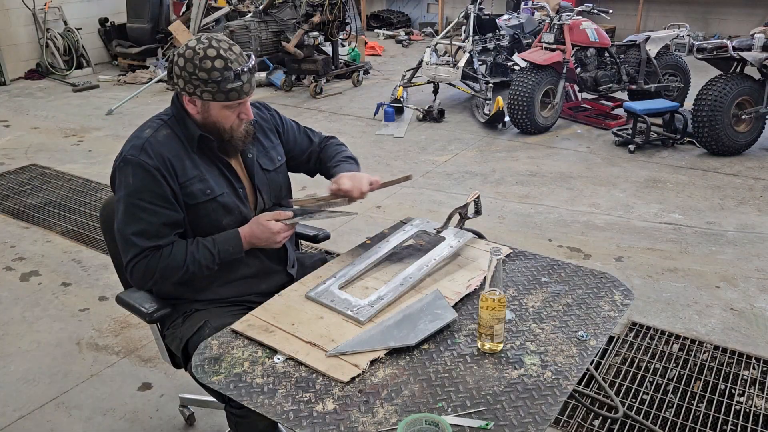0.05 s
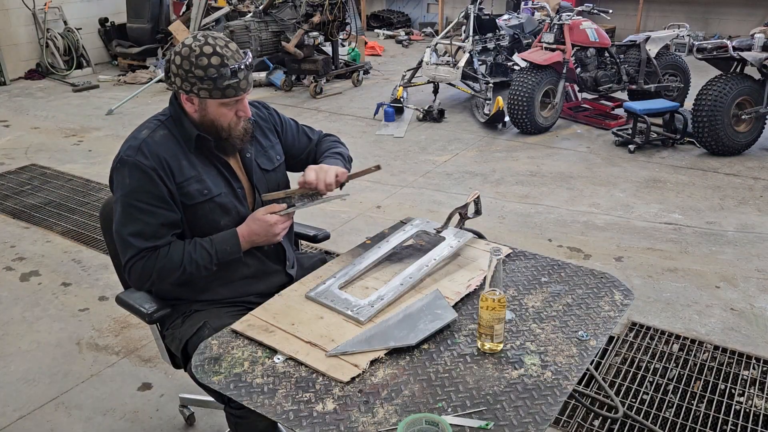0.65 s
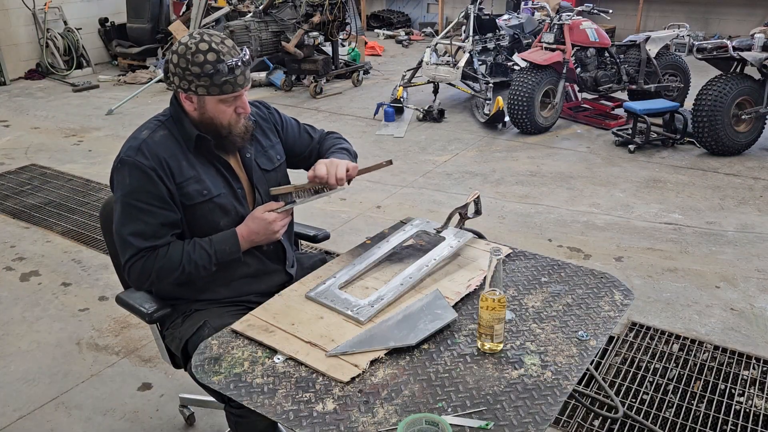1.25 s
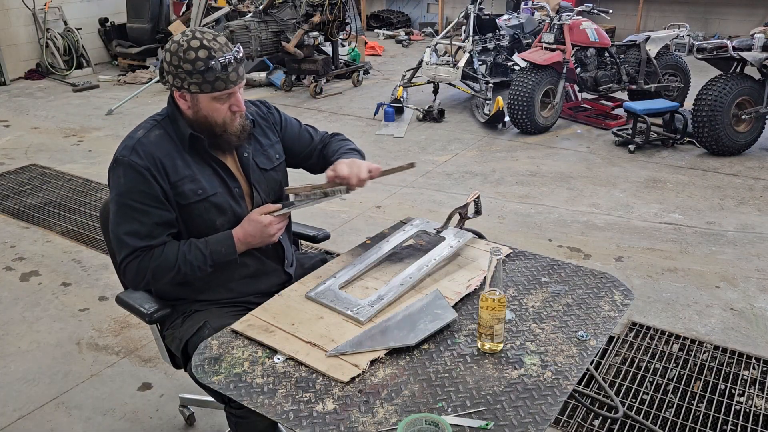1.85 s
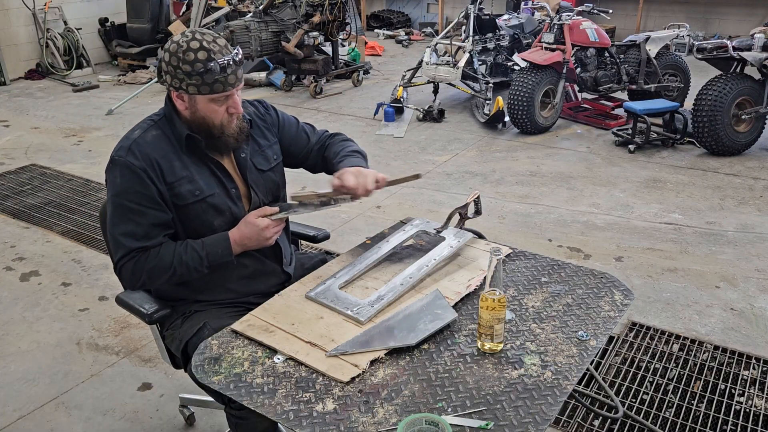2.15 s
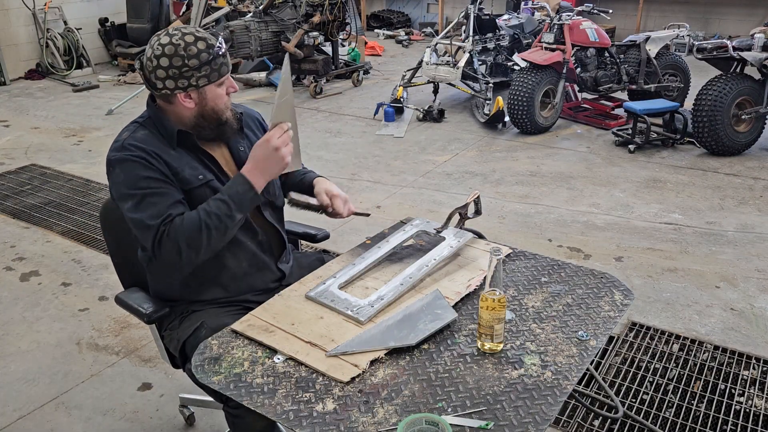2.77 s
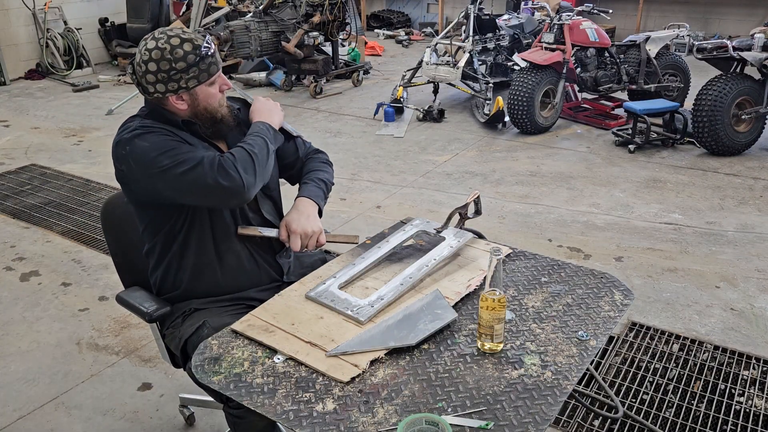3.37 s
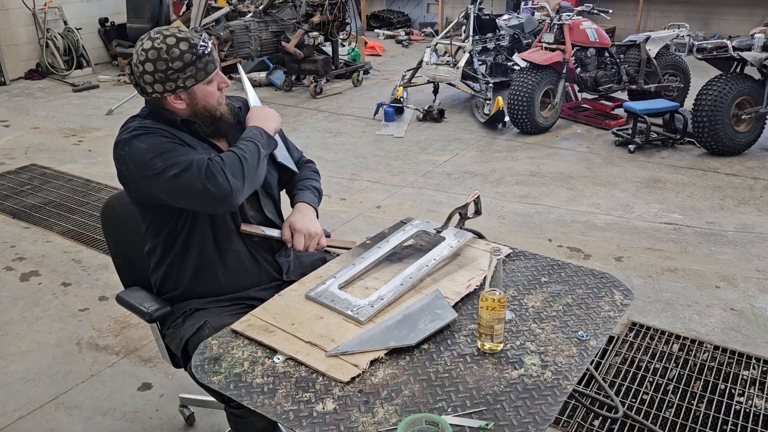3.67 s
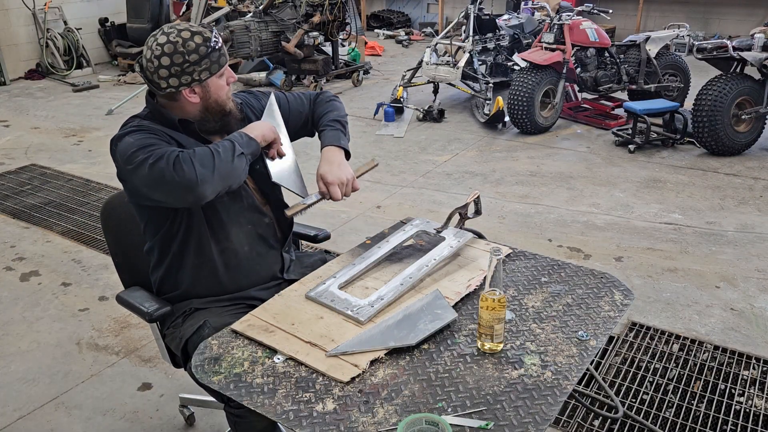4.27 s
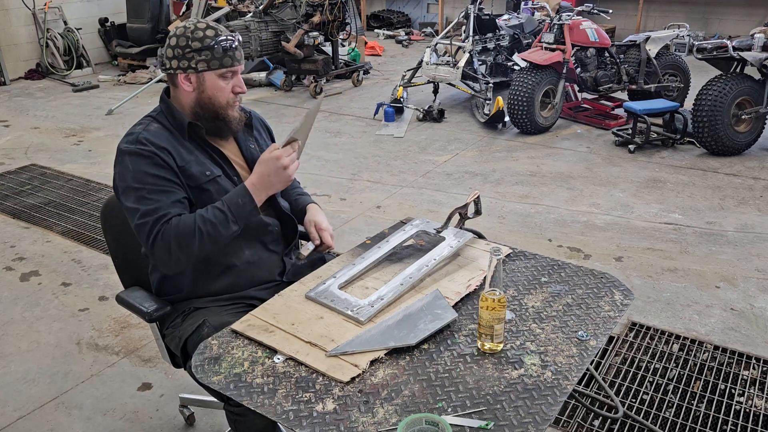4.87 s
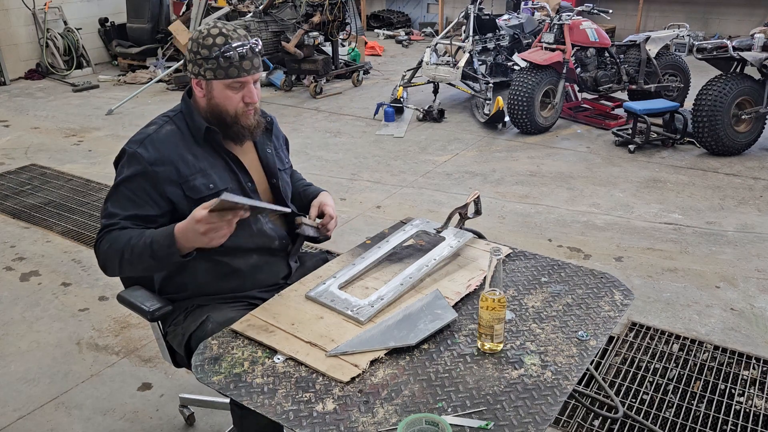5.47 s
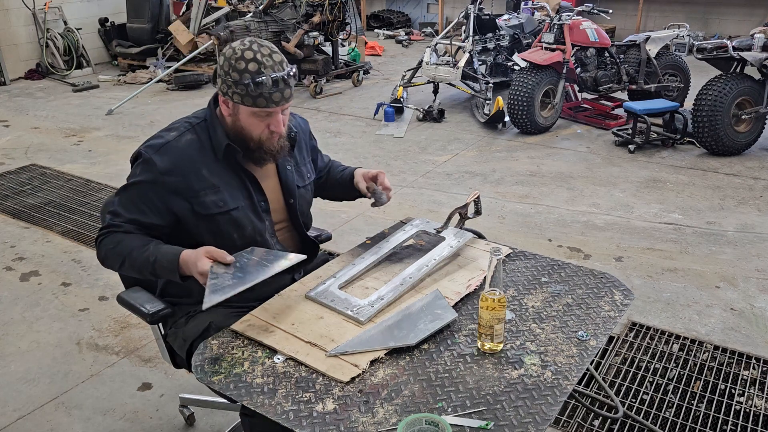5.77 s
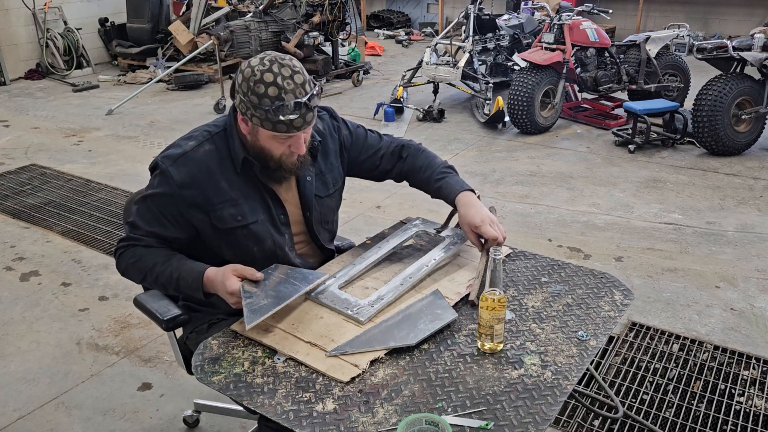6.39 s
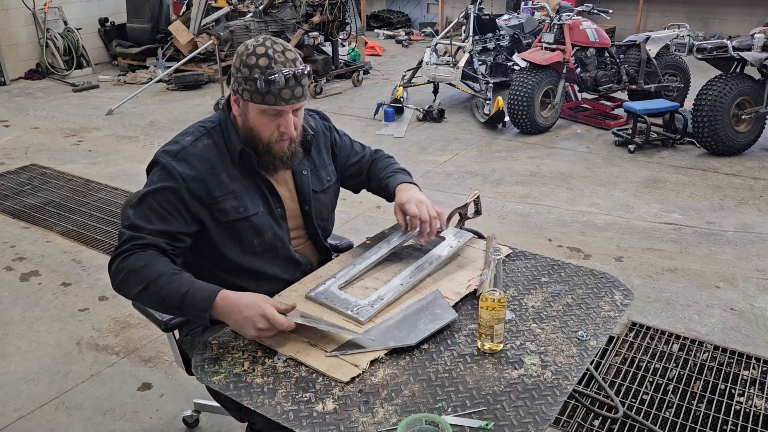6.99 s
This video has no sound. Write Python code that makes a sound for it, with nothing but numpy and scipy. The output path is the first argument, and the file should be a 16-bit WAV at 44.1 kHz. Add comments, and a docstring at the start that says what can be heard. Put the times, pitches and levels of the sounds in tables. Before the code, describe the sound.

A wire brush scrubs a ringing aluminium plate, followed by soft bumps, cloth scrapes and a knock on a steel bench in an echoing workshop.

```python
"""Wire-brushing an aluminium plate

A wire brush scrubs a hand-held plate about nine strokes a second and flicks off its edge: the wires
hiss and make the metal ring. The plate bumps and wipes across a jacket sleeve, a chair clacks, and the
brush is put down on a steel bench, which booms. A large workshop echoes over a faint hum and hiss."""
import sys
import numpy as np
from scipy import signal
from scipy.fft import rfft, irfft, next_fast_len
from scipy.io import wavfile
from scipy.ndimage import uniform_filter1d

SR = 44100
rng = np.random.default_rng(int(sys.argv[2]) if len(sys.argv) > 2 else 0)


def unload_audio(sound):
    """Save the sound as a 16-bit wav file, at the path given as the first command line argument."""
    columns = np.transpose(np.atleast_2d(sound))
    # keep every value between -1 and 1, then stretch to whole-number steps
    steps = np.round(np.clip(columns, -1, 1) * 32767)
    wavfile.write(sys.argv[1], SR, steps.astype(np.int16))


N = 314600
T = np.arange(N) / SR

# the tones the aluminium plate rings at: pitch_hz, level_db, ring_s (time to fade by 60 dB)
PLATE_TONES = [(205.3, -3, 0.2), (242, -6, 0.59), (298, -10.5, 0.24), (363.4, -10.5, 0.17),
               (471.6, -5, 0.15), (508, -7, 0.077), (565, -15.5, 0.68), (661.5, -2, 0.12),
               (944, -1.5, 0.065), (973, -3, 0.084), (1218, -13.5, 0.19), (1427, -10, 0.13),
               (1492, -0.5, 0.023), (1726, -7.5, 0.079), (2154, 0.5, 0.022), (2510, -1, 0.089),
               (2747, 1.5, 0.022), (3150, -3.5, 0.092), (3420, -2, 0.083), (4010, 1.5, 0.023),
               (4300, 0, 0.019), (4850, -3, 0.04), (5445, -0.5, 0.026), (5680, 3.5, 0.044),
               (7138, 3.5, 0.05), (7880, 6, 0.05), (8074, 9.5, 0.048), (8600, -4, 0.016), (12270, 3, 0.037)]
# the tones of the steel bench and the metal parts on it: pitch_hz, level_db, ring_s
BENCH_TONES = [(122, -13.5, 0.4), (450.5, -6, 0.35), (488.6, -0.5, 0.15), (527, -3.5, 0.13),
               (582, -6.5, 0.21), (647, -18, 0.19), (692, -13.5, 0.67), (1245, -20, 0.3), (1392, -16, 0.17),
               (1660, -39, 0.099), (1820, -19.5, 0.033), (2320, -37, .03), (3380, -33, .11)]
# the tone colour of a hard hit: pitch_hz, level_db
CRACK_COLOUR = [(40, -1), (130, -0.5), (600, 0.5), (1400, -2.5), (2800, -6.5), (4000, -19), (6000, -25.5),
                (10000, -34.5), (15000, -31)]


def undb(db):
    """Turn decibels into a number to multiply by."""
    return 10 ** (np.asarray(db) / 20)


def unit(x):
    """Scale a sound to an average (rms) level of 1."""
    return x / np.sqrt(np.mean(x ** 2))


def colour(x, curve):
    """Turn lows and highs up or down along a curve of pitch_hz, level_db."""
    size = next_fast_len(len(x), real=True)
    hz, db = np.transpose(curve)
    gains = undb(np.interp(np.log(np.fft.rfftfreq(size, 1 / SR) + 1), np.log(hz), db))
    return irfft(rfft(x, size) * gains, size)[:len(x)]


def cut_bass(x, hz):
    """Weaken everything below a pitch."""
    return signal.sosfilt(signal.butter(2, hz, "high", fs=SR, output="sos"), x)


def convolve(x, response):
    """Let x set an object or a room ringing."""
    return signal.oaconvolve(x, response)[:N]


def ring(tones):
    """An object's answer to one tap: fading tones with a total energy of 1."""
    t = T[:SR * 3 // 4]
    y = sum((-1) ** k * undb(db) / np.sqrt(ring_s)
            * np.sin(2 * np.pi * hz * t) * np.exp(-np.log(1000) * t / ring_s)
            for k, (hz, db, ring_s) in enumerate(tones))
    return y / np.sqrt(np.sum(y ** 2))


def burst(curve, fade_s):
    """The short noise of a hit, with an energy of 1."""
    t = T[:SR // 8]
    y = colour(rng.standard_normal(len(t)), curve) * np.exp(-t / fade_s)
    return y / np.sqrt(np.sum(y ** 2))


def grains(per_s, spread_db):
    """The crackle of rubbing: many tiny slips of uneven size."""
    sizes = undb(spread_db * np.minimum(rng.exponential(size=N), 5))
    return unit(rng.standard_normal(N) * sizes * (rng.random(N) < per_s / SR))


def wander(per_s):
    """A smooth random drift of about 1 either way."""
    size = int(SR / per_s)
    held = np.repeat(rng.standard_normal(N // size + 2), size)
    return 1.3 * uniform_filter1d(uniform_filter1d(held, size), size)[:N]


def swell(at, rise_s, fade_s):
    """A loudness curve that grows to 1 at a moment and dies away."""
    return np.exp(np.maximum(np.minimum((T - at) / rise_s, (at - T) / fade_s), -40))


def rubs(rows, rise_share):
    """The loudness of rubs that grow for a share of their length and fade for the rest."""
    return sum(undb(db) * swell(at, rise_share * length, (1 - rise_share) * length)
               for at, db, length in rows)


def contacts(rows, rise_s, fade_s):
    """The loudness of touches that differ only in strength."""
    return sum(undb(db) * swell(at, rise_s, fade_s) for at, db in rows)


def add(track, at, sound):
    """Mix a short sound in at a time."""
    start = int(at * SR)
    track[start:start + len(sound)] += sound[:N - start]


def place(x, lead, samples=2):
    """Sound from the left reaches the left microphone a little earlier."""
    side = lead * (np.roll(x, -samples) - np.roll(x, samples))
    return np.array([x + side, x - side])


def background(air_db=-57.5, rumble_db=-50.5, rumble_end_s=0.498):
    """Steady air hiss and mains hum, with a low rumble at first that stops short."""
    # the tone colours of the hiss and the rumble: pitch_hz, level_db
    air_colour = [(20, -11), (60, -7.5), (90, -12), (120, -8.5), (160, -13), (600, -17.5), (800, -21.5),
                  (4500, -25), (6300, -25), (7800, -18.5), (9700, -25), (12000, -15), (15800, -20)]
    rumble_colour = [(20, -0.5), (60, 0), (110, -10.5), (250, -8.5), (500, -11.5), (1000, -21), (3000, -51)]
    # the mains hum: pitch_hz, level_db
    hum_tones = [(59.6, -70), (119, -76), (597.5, -79.5)]
    air = np.array([unit(colour(rng.standard_normal(N), air_colour)) for _ in range(2)])
    hum = sum(undb(db) * np.sqrt(2) * np.sin(2 * np.pi * (hz * T + rng.random()))
              for hz, db in hum_tones)
    rumble = unit(colour(rng.standard_normal(N), rumble_colour))
    rumble *= np.clip((rumble_end_s - T) / 0.0058, 0, 1)
    return undb(air_db) * air + hum + undb(rumble_db) * rumble


def workshop_echo(x, build_s=0.01):
    """The walls give each side its own echo, which builds quickly and lasts longest at middle pitches."""
    # the echo, band by band: pitch_hz, ring_s, level_db
    bands = [(99, 0.33, -8.5), (370, 1.08, 1.5), (1200, 1.42, 0), (3480, 1.14, 0.5), (7250, 0.67, -3),
             (13800, 0.32, -7)]
    t = T[:SR * 3 // 2]
    log_hz = np.log(np.fft.rfftfreq(len(t), 1 / SR) + 1)
    centres = np.log([row[0] for row in bands])
    out = []
    for _ in range(2):
        noise, tail = rfft(rng.standard_normal(len(t))), 0
        for band, (_, ring_s, db) in zip(np.eye(len(bands)), bands):
            band_noise = irfft(noise * np.interp(log_hz, centres, band), len(t))
            fade = np.exp(-np.log(1000) * t / ring_s) * (1 - np.exp(-(t / build_s) ** 2))
            tail += undb(db) * band_noise * fade / np.sqrt(np.sum(fade ** 2))
        out.append(convolve(x, tail))
    return np.array(out)


def chair_clack():
    """A chair tips forward: a quick double clack with a short hollow ring."""
    # the two hits: start_s, level_db
    clacks = [(5.366, -20), (5.37, -20)]
    # the chair's ring: pitch_hz, level_db, ring_s
    chair_tones = [(397, -13, 0.036), (664, -3, 0.081), (747, -5.5, 0.078), (984, -2, 0.07),
                   (1078, 4, 0.056), (1320, -1.5, 0.013), (1460, -5, 0.047), (1630, 0, 0.035),
                   (2740, -15, 0.041)]
    out = np.zeros(N)
    for at, db in clacks:
        add(out, at, undb(db) * ring(chair_tones))
        add(out, at, undb(db - 3.5) * burst(CRACK_COLOUR, fade_s=0.0015))
    return out


def sleeves():
    """Cloth crackles softly as it slides and shoves the cardboard on the bench."""
    # sleeves sliding: peak_s, level_db, length_s
    slides = [(3.04, -61.5, 0.17), (3.57, -61, 0.1), (3.965, -55, 0.039), (4.045, -51, .06),
              (4.122, -57, 0.021), (4.27, -56.5, 0.093), (4.53, -59.5, 0.11), (6.16, -54.5, 0.21)]
    # shoves of the cardboard: peak_s, level_db
    shoves = [(6.032, -44.5), (6.065, -51.5), (6.113, -41.5), (6.152, -51), (6.188, -43.5), (6.24, -50)]
    # the tone colours of the two materials: pitch_hz, level_db
    cloth_colour = [(200, 13), (1400, 9), (3000, 7.5), (6000, 4), (8000, 15), (9700, 2), (12500, 16),
                    (16000, -38)]
    cardboard_colour = [(40, -29), (90, -5), (125, 4.5), (200, -5), (450, -15), (1200, -13.5), (3000, -17),
                        (7000, -23.5)]
    cloth = unit(colour(grains(per_s=12000, spread_db=1.2), cloth_colour))
    cardboard = unit(colour(grains(per_s=4000, spread_db=1.2), cardboard_colour))
    sliding = cloth * rubs(slides, rise_share=0.46)
    return sliding + cardboard * contacts(shoves, rise_s=0.011, fade_s=0.022)


def bristle_touches():
    """Wire tips spring off metal or drag over it, and make the bench ring softly."""
    # tips springing as the brush touches things: peak_s, level_db
    touches = [(5.45, -54), (5.872, -40), (6.01, -47), (6.182, -40), (6.429, -45), (6.441, -40),
               (6.455, -29)]
    # tips dragging over the bench: peak_s, level_db, length_s
    drags = [(5.91, -51, 0.22), (6.48, -46.5, 0.057), (7.09, -49, 0.054)]
    # the tone colour of the tips: pitch_hz, level_db
    tip_colour = [(200, -4.5), (1000, -4.5), (3500, -1), (6000, -2), (7700, 6.5), (9700, -11), (12000, 4),
                  (14500, 4.5), (16000, -4)]
    touching = contacts(touches, rise_s=0.0013, fade_s=0.0064)
    dragging = rubs(drags, rise_share=0.23)
    slips = grains(per_s=25000, spread_db=1.2)
    force = slips * (undb(-15.5) * touching + undb(-4.5) * dragging)
    return (touching + dragging) * unit(colour(slips, tip_colour)) + convolve(force, ring(BENCH_TONES))


def bench_knocks():
    """The wooden handle lands and bounces: a dry crack, a boom of steel and loose parts rattling."""
    # the handle's hits: start_s, weight_db, hardness_db
    knocks = [(6.649, -7.5, -10.5), (6.657, -19, 0.5), (6.668, 4, 2), (6.681, 4.5, -6), (6.801, -5.5, -31),
              (6.838, -10.5, -26), (6.999, -16.5, -7), (7.004, -5, -9.5), (7.037, -10, -31)]
    # the tone colour of the loose parts: pitch_hz, level_db
    rattle_colour = [(200, -17), (400, -13), (510, 0), (680, -12.5), (1000, -19), (2800, -36.5),
                     (6000, -53)]
    force, noise = np.zeros(N), np.zeros(N)
    for at, weight_db, hardness_db in knocks:
        add(force, at, undb([weight_db + 1]))
        add(noise, at, undb(hardness_db - 2) * burst(CRACK_COLOUR, fade_s=0.007))
        add(noise, at, undb(weight_db - 2) * burst(rattle_colour, fade_s=0.051))
    boom = convolve(force, ring(BENCH_TONES))
    return cut_bass(boom + noise, hz=130)  # an open bench top gives off little deep bass


def plate_bumps(boost_db=9):
    """The plate bumps the forearm. Padded blows push softly, so only its low tones answer."""
    # the bumps: start_s, strength_db
    bumps = [(3.626, -4), (3.636, -2.5), (3.656, -1), (3.693, -2)]
    # the tone colour of a padded blow: pitch_hz, level_db
    padding = [(60, -23), (200, -1), (500, 3), (680, -3.5), (950, -12), (1300, -13.5), (1700, -22.5),
               (3000, -29.5), (8000, -56)]
    force = np.zeros(N)
    for at, db in bumps:
        add(force, at, undb([db + boost_db]))
    return convolve(colour(force, padding), ring(PLATE_TONES))


def edge_singing(flutter_db=3):
    """A freed edge lets single tones sing on, fluttering as the plate moves in the hand."""
    # tones left as the brush or sleeve lets go: peak_s, pitch_hz, level_db, rise_s, fade_s
    notes = [(2.283, 2480, -49, .005, .11), (2.283, 3440, -52, .005, .08), (2.283, 4770, -57, .005, .1),
             (3.72, 4300, -68, .05, .2), (4.325, 2120, -54, .005, .025), (4.415, 1400, -54, .005, .02),
             (4.425, 3150, -39, .004, .018), (4.425, 4280, -51, .004, .025)]
    tones = sum(undb(db) * swell(at, rise_s, fade_s) * np.sin(2 * np.pi * hz * T)
                for at, hz, db, rise_s, fade_s in notes)
    return tones * undb(flutter_db * wander(per_s=80))


def arm_strokes(settle_s=0.5012, end_s=2.3, early_cycle_s=0.222, cycle_s=0.2088, push_share=0.52):
    """The arm pushes and pulls; faster is louder. Gives the strength of the hiss and of the ringing."""
    early = T < settle_s  # the first cycles are slower and heavier
    phase = (T - settle_s) / np.where(early, early_cycle_s, cycle_s) % 1
    pushing = phase < push_share
    progress = np.interp(phase, [0, push_share, 1], [0, 1, 2]) % 1
    speed = np.sin(np.pi * np.interp(progress, [0, 0.33, 1], [0, 0.5, 1]))  # fastest a third of the way
    pull_db = np.where(early, -37.5, -40)
    pressure = undb(np.where(pushing, -36, pull_db))
    hiss = pressure * speed ** 1.22 + undb(-52)  # at each turn the bent wires still scratch faintly
    hiss *= undb(2 * wander(per_s=69.82)) * (T < end_s)  # tufts hold and let go together
    ring_db = np.where(pushing, -4, -8) - 4.5 * T  # weaker on the pull, and dying down over time
    return hiss, hiss * undb(ring_db)


def brush_on_plate(ring_db=-3, drift_db=5.5, groups=5):
    """Wires, and later the jacket, slip over the plate: the slips hiss and make it ring. In stereo."""
    # wires snagging as a pull begins: peak_s, level_db, length_s
    snags = [(.83, -37, 0.0097), (1.255, -38, 0.0037), (1.88, -36, 0.0098), (2.09, -36, 0.0089)]
    # the plate's edge scraping the jacket: peak_s, level_db, length_s
    scrapes = [(3.1, -50.5, .008), (3.215, -53.5, 0.024), (3.675, -48.5, 0.13), (4.212, -46.5, 0.0037),
               (4.316, -47, 0.014), (4.332, -41.5, 0.013), (4.424, -41.5, 0.082)]
    # the tone colour of the wires: pitch_hz, level_db
    wire_colour = [(200, -22), (500, -17.5), (1000, -21.5), (1500, -7), (4300, -5.5), (6300, -5), (8000, 3),
                   (9700, -10.5), (10900, -6), (11700, 1), (13400, -1), (14500, 0.5), (16000, -6.5)]
    scrubbing, scrub_drive = arm_strokes()
    snagging = rubs(snags, rise_share=0.15)
    scraping = rubs(scrapes, rise_share=0.43)
    flick = undb(-30) * swell(at=2.262, rise_s=0.011, fade_s=0.012)  # the last push leaves the edge
    hiss_level = undb(-3) * (scrubbing + snagging + flick + scraping)
    drive = scrub_drive + undb(-1) * snagging + undb(-4) * flick + undb(-10.5) * scraping
    slips = grains(per_s=24000, spread_db=1.3)
    force = cut_bass(slips * drive, hz=800)  # light wires hardly stir the plate's low tones
    out = place(hiss_level * unit(colour(slips, wire_colour)), lead=0.57)
    # the contact crosses still and lively spots, so groups of tones swell and fade
    energy = sum(undb(db) ** 2 for _, db, _ in PLATE_TONES)
    for k in range(groups):
        tones = PLATE_TONES[k::groups]
        share = np.sqrt(sum(undb(db) ** 2 for _, db, _ in tones) / energy)
        drift = undb(ring_db + drift_db * wander(per_s=21.88))
        ringing = convolve(force * drift, share * ring(tones))
        out += place(ringing, lead=0.43, samples=2 * k + 1)  # each group spreads its own way
    return out


def scene():
    """Hands and plate to the left, the bench nearer the middle, all in one room."""
    scrub, bumps, singing = brush_on_plate(), plate_bumps(), edge_singing()
    handling = sleeves() + bristle_touches()
    knocks, clack = bench_knocks(), chair_clack()
    # how much of each source reaches the walls: sound, level_db
    to_walls = [(scrub.mean(axis=0), -1), (bumps, -2), (singing, -7),
                (handling, -3), (knocks, -5), (clack, 0)]
    echo = workshop_echo(sum(undb(db) * sound for sound, db in to_walls))
    direct = scrub + place(bumps + handling + singing, lead=0.56) + place(knocks + clack, lead=0.42)
    return direct + echo + background()


def record(dry, right_lift_db=5, top_hz=15800):
    """The microphone pair is widest at middle pitches, and its right side is brighter at the very top."""
    # stereo width, as the gain on what differs between left and right: pitch_hz, level_db
    width = [(60, -9), (250, -6.5), (600, -2.5), (1300, 0.5), (3000, 1), (6500, 1), (7600, -12),
             (10000, -28), (12000, -1), (16000, -8)]
    mid = (dry[0] + dry[1]) / 2
    side = colour((dry[0] - dry[1]) / 2, width)
    left = colour(mid + side, [(10900, 0.0056), (11700, -right_lift_db / 2)])
    right = colour(mid - side, [(10900, 0), (11700, right_lift_db / 2)])
    treble_cut = signal.ellip(10, 0.2, 75, top_hz, fs=SR, output="sos")
    return signal.sosfilt(treble_cut, np.array([left, right]))


dry = scene()
out = record(dry)
unload_audio(out)
```